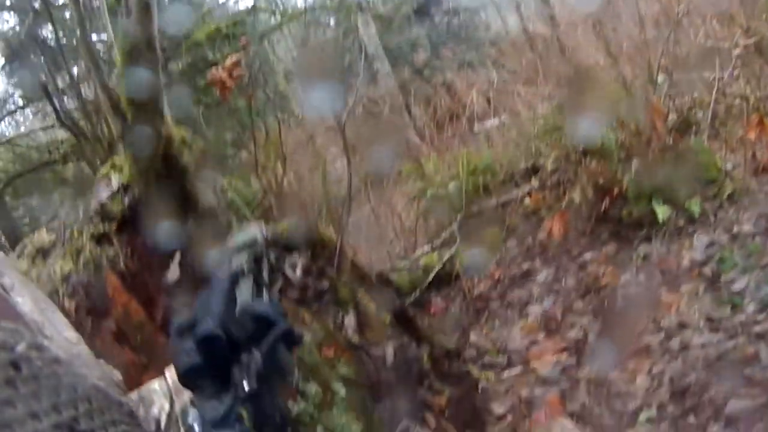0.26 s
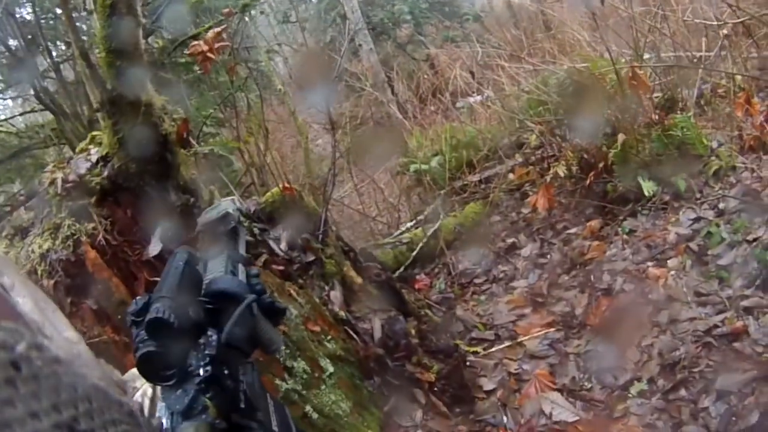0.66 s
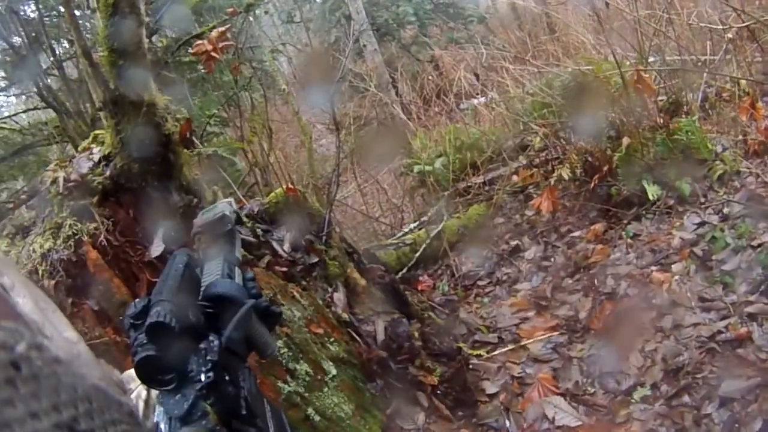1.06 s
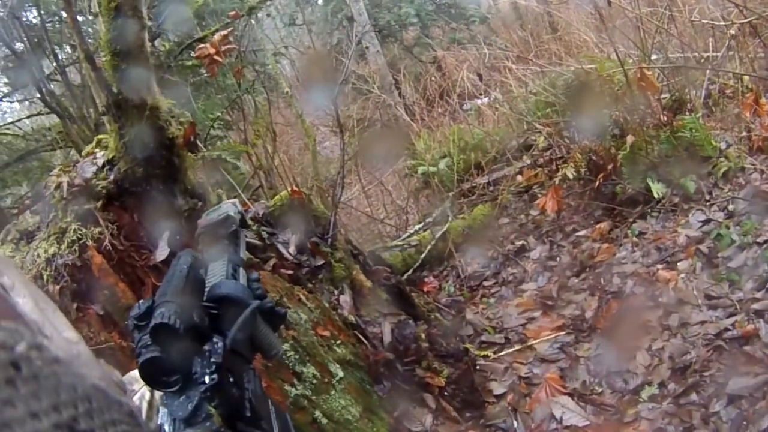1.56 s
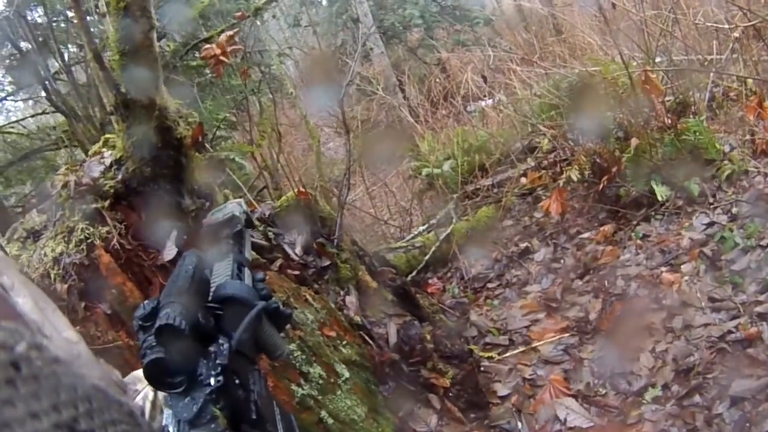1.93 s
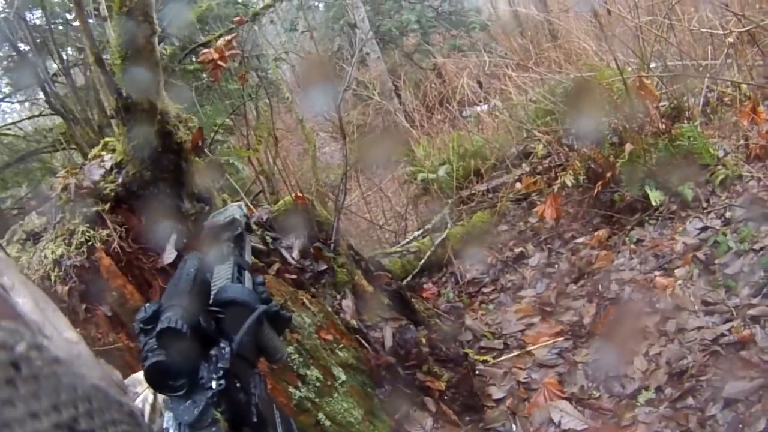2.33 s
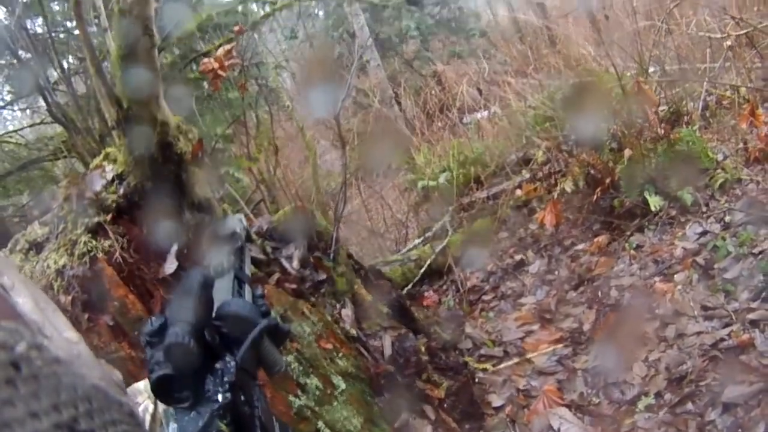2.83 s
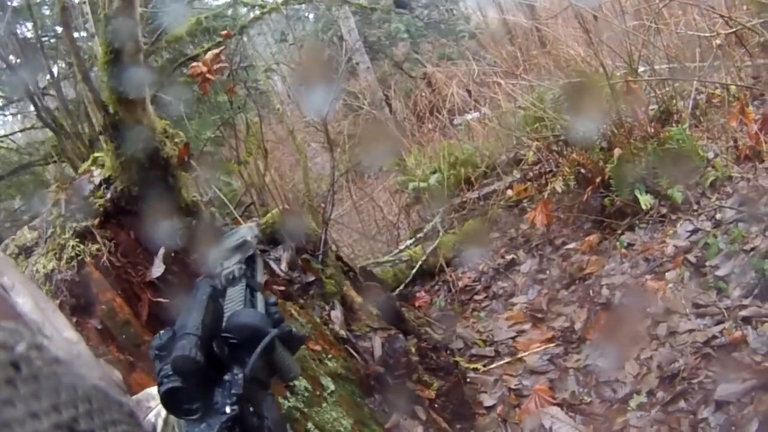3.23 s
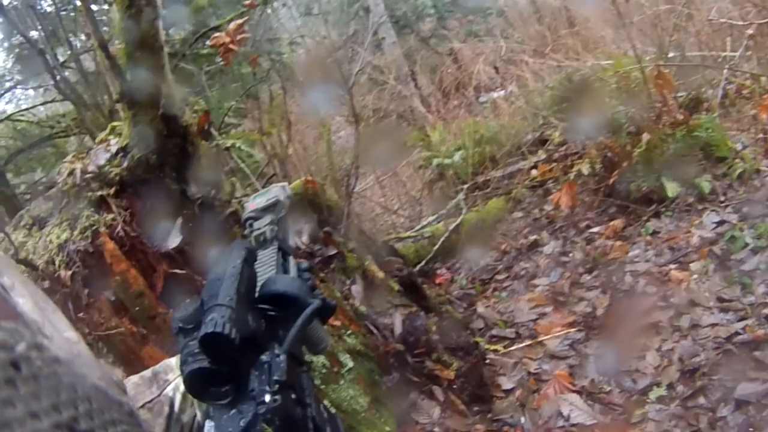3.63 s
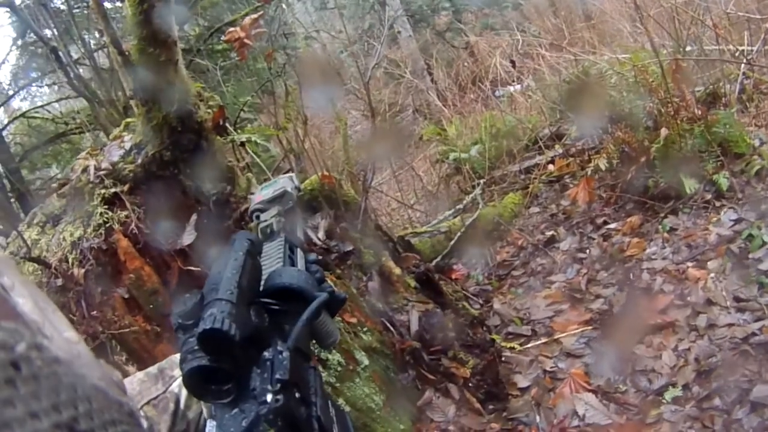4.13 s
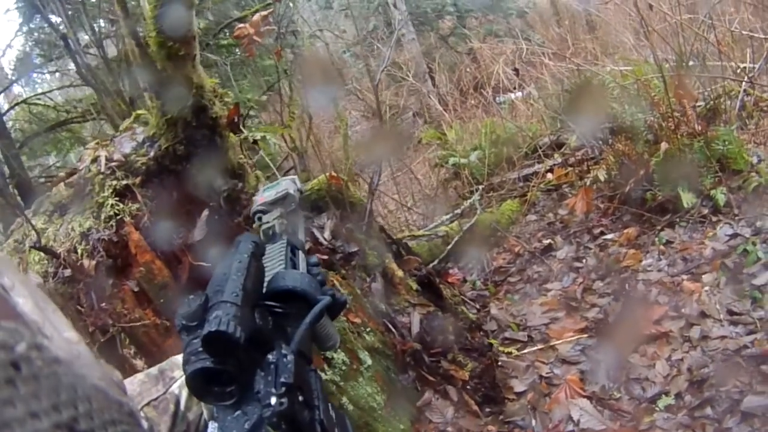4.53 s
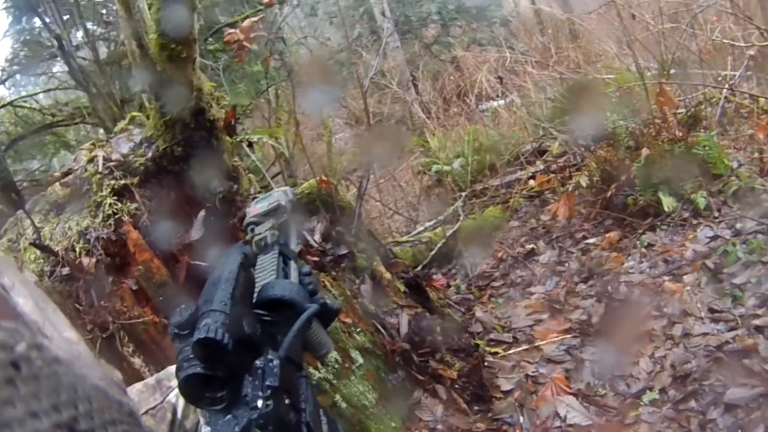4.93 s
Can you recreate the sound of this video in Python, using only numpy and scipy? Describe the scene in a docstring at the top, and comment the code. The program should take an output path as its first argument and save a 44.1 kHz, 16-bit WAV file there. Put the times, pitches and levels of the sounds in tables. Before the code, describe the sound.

Faint woodland rain and wind lie under a steady run of close airsoft rifle shots, each a brief whir, snapping pop and pellet rattle.

```python
"""Light rain and a little wind in a wet wood. From 1 s an electric airsoft rifle fires fifteen single
shots close by. In each, the motor starts winding the spring as the trigger clicks, the piston slips
free, air pops from the muzzle, the piston slams home and loose pellets rattle in the magazine.
The trigger ticks on release and the trees return a short tail. After 4.5 s the rain carries on
while the wind eases."""
import sys
import numpy as np
from scipy import signal
from scipy.fft import rfft, irfft
from scipy.io import wavfile
from scipy.ndimage import uniform_filter1d

SR = 44100
rng = np.random.default_rng(int(sys.argv[2]) if len(sys.argv) > 2 else 0)


def to_wav(s):
    """Save 16-bit WAV."""
    ch = np.atleast_2d(s).T  # columns
    pcm = np.round(np.clip(ch, -1, 1) * 32767)  # PCM
    wavfile.write(sys.argv[1], SR, pcm.astype(np.int16))


N = 228646


def undb(db):
    return 10 ** (np.asarray(db) / 20)


def band(x, hz, width_hz):
    """Resonance, unity gain at the centre."""
    return signal.lfilter(*signal.iirpeak(hz, hz / width_hz, SR), x)


def add(out, at_s, sound):
    i = int(at_s * SR)
    out[i:i + len(sound)] += sound[:N - i]


def walk(rate_hz):
    """Random levels, held and slewed; spread near 1."""
    hold = int(SR / rate_hz)
    steps = np.repeat(rng.standard_normal(N // hold + 1), hold)
    return uniform_filter1d(steps, hold // 3)[:N]


def colour(x, bands, flicker_db=0):
    """Steep parallel resonances with optional independent flicker; rms 1."""
    y = 0
    for k, (hz, width_hz, db) in enumerate(bands):
        gain = undb(db + flicker_db * walk(25)) if flicker_db else undb(db)
        y = y + (-1) ** k * gain * band(band(x, hz, width_hz), hz, width_hz)
    return y / np.std(y)


def pat(hz, q, fade_s):
    """Short noise burst around one pitch; peak 1."""
    t = np.arange(int(.02 * SR)) / SR
    burst = rng.standard_normal(len(t)) * np.exp(-t / fade_s)
    y = band(band(burst, hz, hz / q), hz, hz / q)
    return y / np.max(np.abs(y))


def ring(modes, scatter_db, push_s):
    """One blow on randomly scattered modes, softer for a longer push; peak 1."""
    t = np.arange(int(.08 * SR)) / SR
    hz, db, t60_s = np.transpose(modes)[:, :, None]
    db = db + scatter_db * rng.standard_normal(db.shape)
    hz = hz * (1 + .008 * rng.standard_normal(hz.shape))
    partials = undb(db - 60 * t / t60_s) * np.sin(2 * np.pi * hz * t)
    y = partials.sum(axis=0) * (1 - np.exp(-t / push_s))
    return y / np.max(np.abs(y))


# Rain and wind spectrum: f/Hz, relative density/dB
RAIN_SPECTRUM = [(15, -84), (25, -2), (64, 0), (110, -9), (198, -14.5), (523, -18), (582, -19), (1020, -21),
                 (1450, -23.5), (2010, -21.5), (3930, -33), (9050, -32), (15500, -33)]
# Wind rumble envelope: t/s, level/dB
WIND_ENVELOPE = [(0, 1), (1, -0.5), (4.4, -0.5), (5.18, -5.5)]


def rain_and_wind(rms_db=-64):
    """Soft rain patter over gusty rumble, with a faint high hiss that flickers in level."""
    hz = np.fft.rfftfreq(N, 1 / SR)
    knot_hz, knot_db = np.transpose(RAIN_SPECTRUM)
    spectrum = rfft(rng.standard_normal(N)) * undb(np.interp(np.log(hz + 1), np.log(knot_hz), knot_db))
    low = 200 ** 2 / (hz ** 2 + 200 ** 2)
    high = hz ** 2 / (hz ** 2 + 3500 ** 2)
    wind_db = np.interp(np.arange(N) / SR, *np.transpose(WIND_ENVELOPE))
    rumble = irfft(spectrum * low, N) * undb(3.4 * walk(24) + wind_db)
    patter = irfft(spectrum * (1 - low - high), N) * undb(.27 * walk(21))
    hiss = irfft(spectrum * high, N) * undb(3.2 * walk(35))
    bed = rumble + patter + hiss
    return undb(rms_db) * bed / np.std(bed)


# Near raindrops: t/s, level/dB, f/Hz
NEAR_DROPS = [(.025, -55, 920), (.04, -56, 2270), (.175, -54, 1880), (.259, -50, 1800), (.325, -56, 1010),
              (.515, -54.5, 2310), (.589, -55.5, 1850), (4.7, -53, 2430), (4.858, -61, 1140),
              (4.872, -53.5, 2220), (5.025, -53, 2770), (5.131, -49, 2090)]


def raindrops():
    """Soft drops land at random; near ones add a bright splash."""
    out = np.zeros(N)
    for when, pitch, size in rng.random((220, 3)):
        drop = pat(900 * 2 ** (2.84 * pitch), q=1.7, fade_s=.002)
        add(out, when * N / SR, undb(-69.5 + 6.5 * size) * drop)
    for at_s, db, hz in NEAR_DROPS:
        drop = pat(hz, q=2.04, fade_s=.0014)
        splash = undb(-1.5) * pat(11200, q=1.6, fade_s=.0011)
        add(out, at_s, undb(db) * (drop + splash))
    return out


# Shots: slam t/s, shot level/dB, rattle level/dB, rattle length/s
SHOTS = [(1.132, -23, -41, .17), (1.4102, -22.5, -40, 0.18), (1.6536, -22.5, -39.5, 0.17),
         (1.8807, -22.5, -40, 0.23), (2.1183, -22, -40, 0.17), (2.3441, -22, -41, 0.16),
         (2.5795, -22.5, -40.5, 0.15), (2.8171, -22.5, -41.5, 0.16), (3.0503, -23, -40.5, 0.15),
         (3.2871, -22.5, -40.5, 0.15), (3.5182, -22, -38.5, 0.16), (3.7453, -21, -39, 0.24),
         (3.985, -21, -37.5, .19), (4.218, -21, -37.5, 0.2), (4.4662, -21, -37.5, 0.23)]
# Gear noise bands: f/Hz, width/Hz, level/dB
GEAR_BANDS = [(467, 1200, -10), (940, 1380, 2.5), (2150, 1790, 8), (4040, 120, -40), (4520, 4800, -12),
              (9460, 3100, 0), (13150, 3000, -2.5)]


def motor(lead_s=.104, release_lead_s=.012):
    """Gears spin up, sag under the spring and fall silent as the piston slips free."""
    free_hz, spin_up_s, sag_from_s, sag_hz_per_s = 1660, .035, .052, 5600
    out = np.zeros(N)
    grit = colour(rng.standard_normal(N) * undb(2.5 * walk(400)), GEAR_BANDS)
    waver, flutter = walk(140), walk(200)
    t = np.arange(int((lead_s - release_lead_s) * SR)) / SR
    mesh_hz = free_hz * np.tanh(t / spin_up_s) - sag_hz_per_s * np.maximum(t - sag_from_s, 0)
    speed = mesh_hz / mesh_hz.max()
    for slam_s, db, *_ in SHOTS:
        on = int((slam_s - lead_s) * SR) + np.arange(len(t))
        phase = 2 * np.pi * np.cumsum(mesh_hz * (1 + .013 * flutter[on])) / SR
        tone = undb(-23.5 + 2.9 * waver[on]) * speed ** 2.1 * np.sin(phase)
        overtones = np.sin(2 * phase) + undb(-21) * (np.sin(3 * phase) + np.sin(4 * phase))
        overtones *= undb(-25.5 + 1.7 * waver[on]) * speed ** 3
        tooth_contact = 1 + .12 * np.cos(phase)
        rasp = undb(-26) * speed ** 1.2 * tooth_contact * grit[on]
        out[on] += undb(db) * (tone + overtones + rasp)
    return out


# Trigger releases: t/s, level/dB
TRIGGER_RELEASES = [(1.24, -33), (1.259, -44), (1.497, -35), (1.745, -31.5), (1.971, -36), (2.224, -35.5),
                    (2.451, -34.5), (2.666, -40), (2.9, -36), (3.129, -44), (3.376, -42.5), (3.597, -41),
                    (3.843, -42), (4.566, -27.5), (4.59, -41)]
# Trigger modes: f/Hz, level/dB, t60/s
TRIGGER_MODES = [(503, 3.5, 0.0047), (870, -1, 0.0092), (1187, -4.5, 0.014), (1680, -4, 0.016),
                 (2070, -1, 0.017), (2460, -12.5, 0.038), (2540, -66, 0.0079)]


def trigger(pull_lead_s=.1, pull_db=-45):
    """Each pull and release is a dry click of four quick, weakening contacts."""
    out = np.zeros(N)
    pulls = [(slam_s - pull_lead_s, pull_db) for slam_s, *_ in SHOTS]
    for at_s, db in TRIGGER_RELEASES + pulls:
        add(out, at_s, undb(db - 2) * crack(fade_s=.0025))
        for k in range(4):
            lag_s = .0013 * k * rng.uniform(.7, 1.3)
            add(out, at_s + lag_s, undb(db - 3.5 * k) * ring(TRIGGER_MODES, scatter_db=3, push_s=.0003))
    return out


# Catch, nozzle, piston landing, slam, three rebounds: t/s from slam, ring level/dB, crack level/dB
GEARBOX_KNOCKS = [(-.0131, -15, -26), (-.0095, -13, -17), (-.0052, -9, -28), (-.0014, -2, -20),
                  (.0002, 3, -10), (.0049, -4, -8), (.0135, -12.5, -20), (.0435, -16, -25)]
# Rifle body modes: f/Hz, level/dB, t60/s
BODY_MODES = [(193, -31, 0.0095), (330, 1, 0.008), (543, -3.5, 0.081), (866, 10.5, 0.12),
              (1036, 5.5, 0.065), (1167, 14, 0.015), (1430, 0, 0.061), (1830, -4, 0.02), (1898, 9.5, 0.013),
              (2109, 13, 0.029), (2180, -6, 0.02), (2454, 2, 0.034), (3230, -40, 0.044), (5370, -4.5, .013)]


def gearbox_knocks(grip_t60_s=.058):
    """Impacts in the gearbox ring the body, damped by hands and shoulder."""
    out = np.zeros(N)
    held_modes = [(hz, db, 1 / (1 / t60_s + 1 / grip_t60_s)) for hz, db, t60_s in BODY_MODES]
    for slam_s, db, *_ in SHOTS:
        for lag_s, ring_db, crack_db in GEARBOX_KNOCKS:
            body = undb(db + ring_db) * ring(held_modes, scatter_db=1.2, push_s=.0003)
            edge = undb(db + crack_db + 3 * rng.standard_normal()) * crack(fade_s=.002)
            add(out, slam_s + lag_s, edge - body)
    return out


def muzzle_pops(lead_s=.0122, ground_delay_s=.01029):
    """Sharp overpressure, a slow backswing of the air column, then the ground reflection."""
    t = np.arange(int(.06 * SR)) / SR - .003
    swing_t = np.maximum(t - .0008, 0)
    spike = np.exp(-np.abs(t) / .00045)
    backswing = np.sin(2 * np.pi * 120 * swing_t) * np.exp(-swing_t / .0032)
    stock_jolt = np.sin(2 * np.pi * 62 * swing_t) * np.exp(-swing_t / .015)
    pop = spike - undb(-3.5) * backswing - undb(-16.5) * stock_jolt
    reflection = undb(-8) * np.roll(pop, int(ground_delay_s * SR))
    out = np.zeros(N)
    for slam_s, db, *_ in SHOTS:
        add(out, slam_s - lead_s, undb(db - 1.5) * (pop + reflection))
    return out


# Bright resonant bands that colour the rattle, knocks and clicks: f/Hz, width/Hz, level/dB
BRIGHT_BANDS = [(413, 1000, -9), (1120, 3200, -8), (2213, 780, 1), (2400, 400, -4.5), (6700, 1140, -9.5),
                (7277, 480, -2), (8400, 1470, -5), (9070, 430, 5), (9650, 540, 2), (9820, 530, 2.5),
                (10470, 1130, -3.5), (12040, 700, -8.5), (13850, 500, 1), (13180, 3700, -8.5)]
RATTLE_FADE_S = .087


def pellet_rattle(lead_s=.011, rise_s=.0029):
    """Jolted pellets click densely, fade and stop; each band wavers in level."""
    shake = np.zeros(N)
    for slam_s, _, db, length_s in SHOTS:
        t = np.maximum(np.arange(N) / SR - slam_s + lead_s, 0)
        shake += undb(db) * (1 - np.exp(-t / rise_s)) * np.exp(-t / RATTLE_FADE_S - (t / length_s) ** 6)
    spikes = (rng.random(N) < .015) * undb(10.7 * rng.random(N))
    clicks = rng.standard_normal(N) * (.67 + spikes)
    return shake * undb(2 * walk(70)) * colour(clicks, BRIGHT_BANDS, flicker_db=2.5)


def crack(fade_s):
    """Bright edge of a knock or click; peak near 1."""
    t = np.arange(int(.08 * SR)) / SR
    return .5 * colour(rng.standard_normal(len(t)), BRIGHT_BANDS) * np.exp(-t / fade_s)


# Loud single pellets: t/s, level/dB, f/Hz
LOUD_CLACKS = [(1.1444, -33, 9300), (1.2098, -36, 9800), (1.4601, -42, 12000), (2.1327, -25, 12500),
               (2.1974, -28.5, 10400), (2.3595, -22, 11300), (3.0678, -18, 10600), (3.1016, -41, 9700),
               (3.3632, -30.5, 9500), (4.005, -22.5, 9600), (4.0315, -31, 9600), (4.2376, -21.5, 10200),
               (4.295, -30, 11400), (4.4132, -33, 10700), (4.4856, -27.5, 9600), (4.5383, -32, 12000)]
# Magazine shell modes: f/Hz, level/dB, t60/s
SHELL_MODES = [(8300, -23, .27), (9800, 7, .27), (9900, 0, .043)]


def pellet_clacks(soft_db=-40, soft_hz=10200):
    """Single pellets strike and ring the shell: the loud ones, plus a soft one per shot."""
    out = np.zeros(N)
    soft_clacks = [(slam_s + RATTLE_FADE_S * rng.random(), soft_db + 3 * rng.standard_normal(), soft_hz)
                   for slam_s, *_ in SHOTS]
    for at_s, db, hz in LOUD_CLACKS + soft_clacks:
        add(out, at_s, undb(db) * pat(hz, q=2.8, fade_s=.0009))
        add(out, at_s, undb(db - 22) * ring(SHELL_MODES, scatter_db=4.4, push_s=.0034))
    return out


def trees(dry, t60_s=.34, db=-26):
    """Trunks and bank scatter a short dull tail."""
    t = np.arange(int(.4 * SR)) / SR
    tail = band(rng.standard_normal(len(t)), 2230, 2300) * undb(-60 * t / t60_s) * (t > .012)
    return undb(db) * signal.fftconvolve(dry, tail / np.sqrt(np.sum(tail ** 2)))[:N]


def scene():
    weather = rain_and_wind() + raindrops()
    rifle = motor() + trigger() + gearbox_knocks() + muzzle_pops() + pellet_rattle() + pellet_clacks()
    return (weather + rifle + trees(rifle))[None]


def record(dry, low_hz=45, top_hz=15500):
    """A small camera rolls off the deepest bass and cuts the top."""
    dry = signal.sosfilt(signal.butter(2, low_hz, "high", fs=SR, output="sos"), dry)
    return signal.sosfilt(signal.ellip(10, .2, 60, top_hz, fs=SR, output="sos"), dry)


dry = scene()
out = record(dry)
to_wav(out)
```